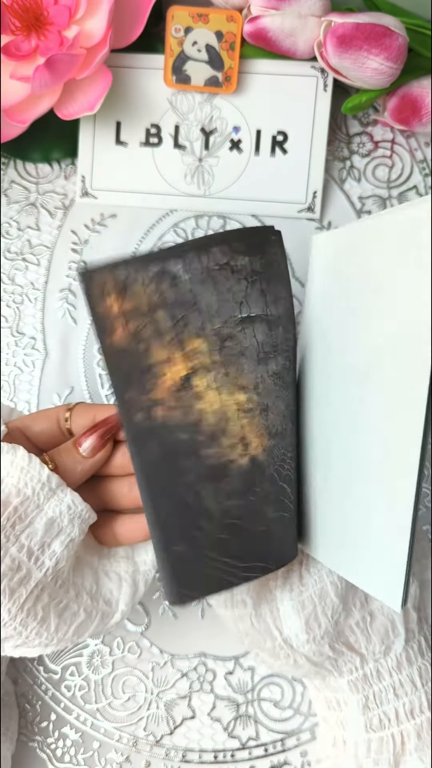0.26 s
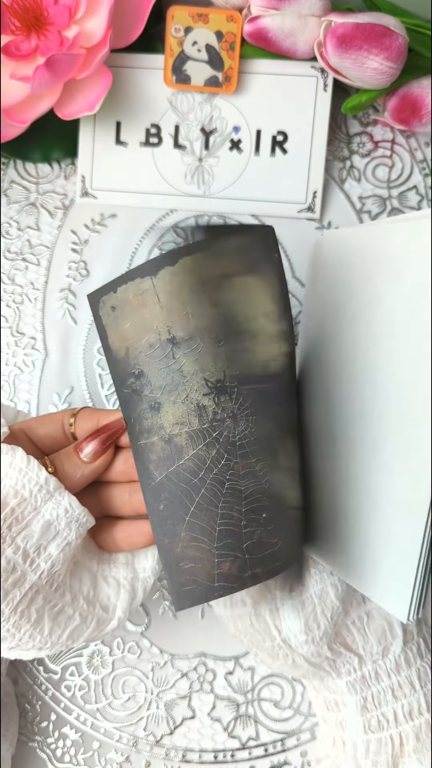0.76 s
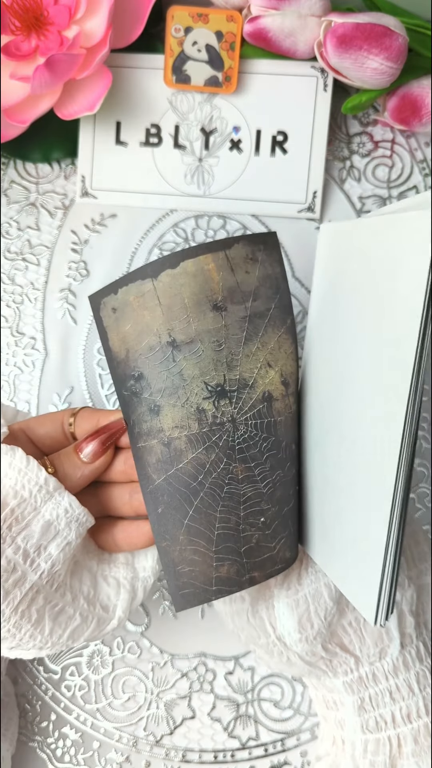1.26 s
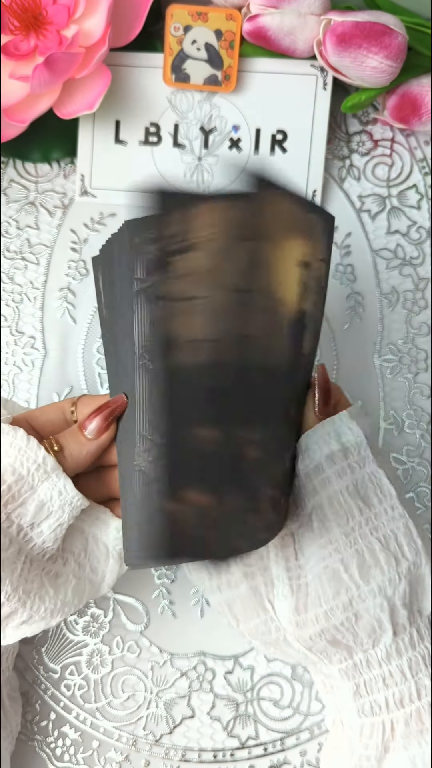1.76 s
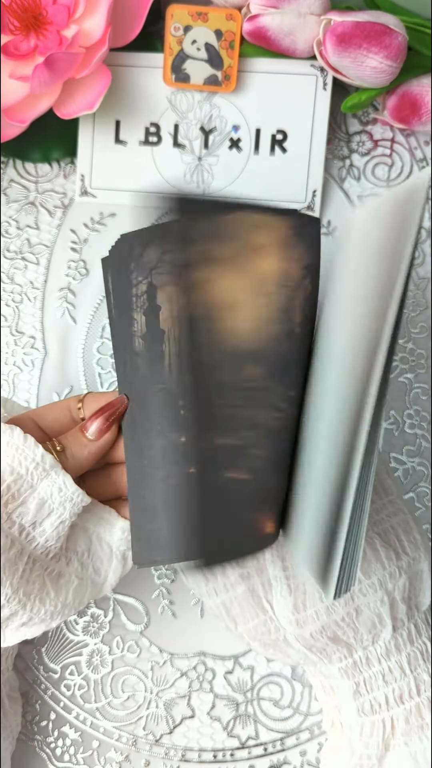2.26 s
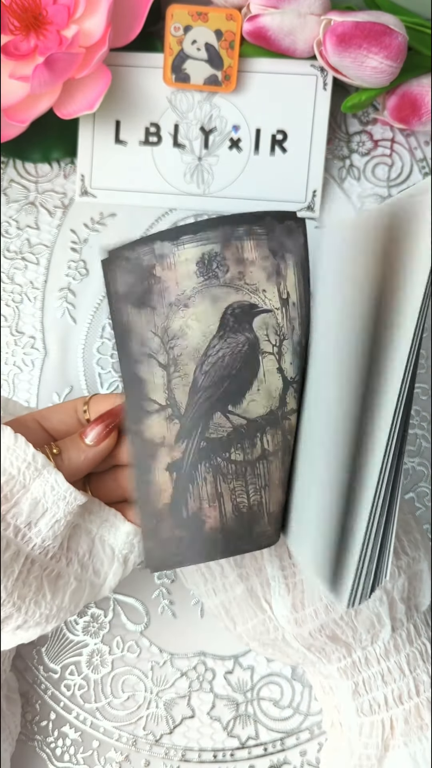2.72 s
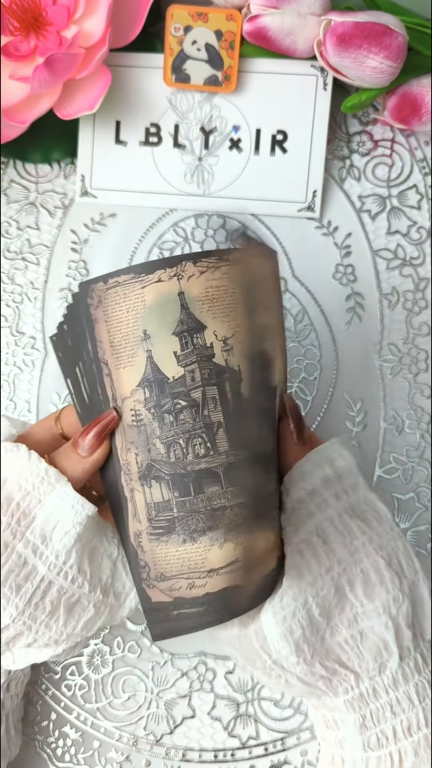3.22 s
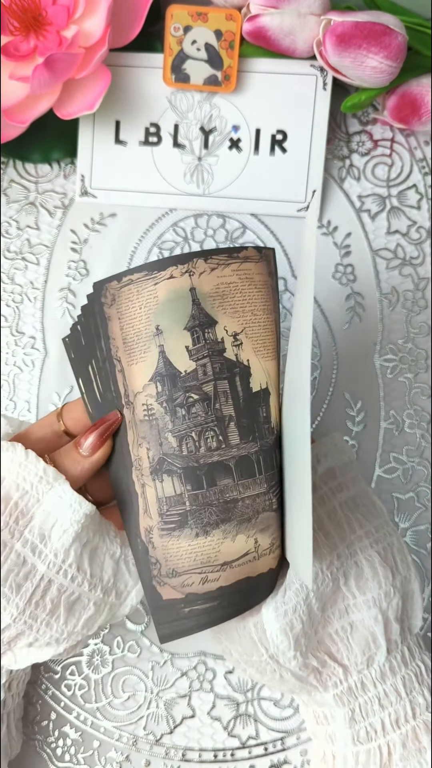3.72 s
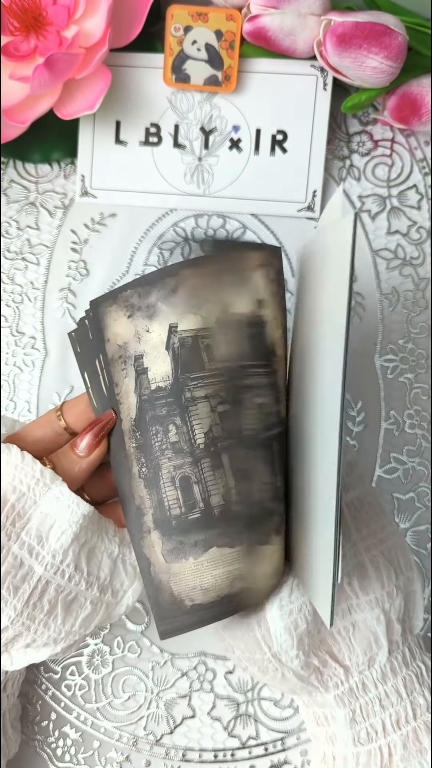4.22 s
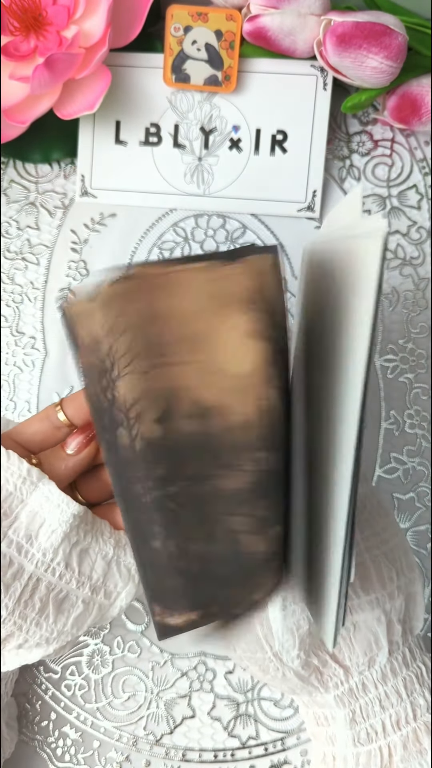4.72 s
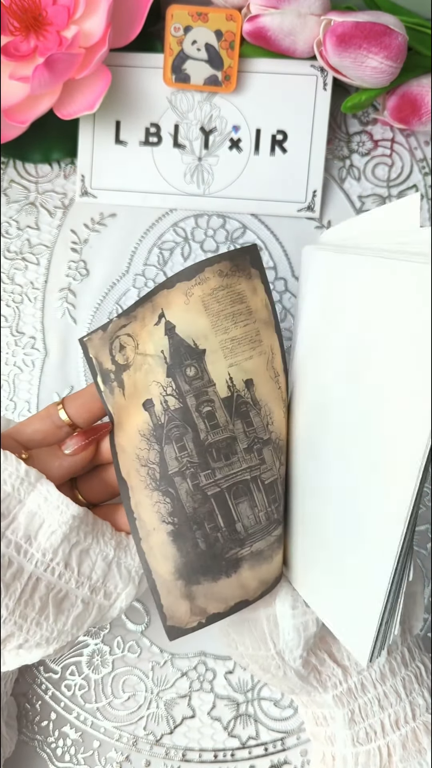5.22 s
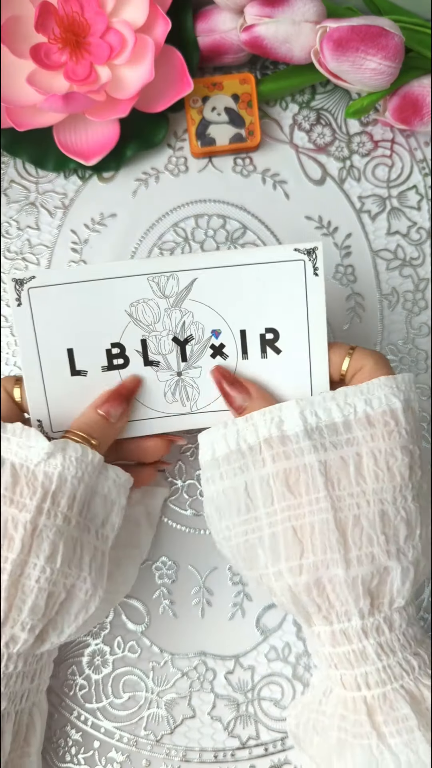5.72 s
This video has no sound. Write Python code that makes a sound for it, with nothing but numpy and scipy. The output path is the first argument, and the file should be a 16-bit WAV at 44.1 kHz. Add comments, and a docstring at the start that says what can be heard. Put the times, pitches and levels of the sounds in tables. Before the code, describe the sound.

Hands thumb through a stack of stiff paper sheets above a table. Each edge snaps free with a crisp tick and slides on with a short hiss, in uneven runs over soft rustling. A sheet slaps the stack midway, and a sharper, louder snap comes near the end. Then thumbs rub a card with quick ticks. The microphone is close, in a small room with faint hiss and rumble.

```python
"""Paper rustles and ticks over faint hiss and rumble: hands thumb through a stack of stiff printed
sheets above a table, close to a mono microphone. Each sheet edge snaps off the thumb and slides on
with a short hiss, and sheets slap and scrape on the stack, all with a touch of small room.
At the end the thumbs rub a card, which rings under the uneven friction."""
import sys
import numpy as np
from scipy import signal
from scipy.fft import rfft, irfft, next_fast_len
from scipy.io import wavfile
from scipy.ndimage import uniform_filter1d

SR = 44100
rng = np.random.default_rng(int(sys.argv[2]) if len(sys.argv) > 2 else 0)


def put_to_file(sound):
    """Save the sound as 16-bit audio at rate SR, in the file named by the first command-line argument."""
    columns = np.atleast_2d(sound).T  # one column per channel
    safe = np.clip(columns, -1, 1)
    whole_steps = np.round(safe * 32767)
    wavfile.write(sys.argv[1], SR, whole_steps.astype(np.int16))


N = 263751


def gain_of(db):
    """dB to gain."""
    return 10 ** (np.asarray(db) / 20)


def unit_rms(x):
    """Scales to rms 1."""
    return x / np.sqrt(np.mean(x ** 2) + 1e-20)


def unit_peak(x):
    """Scales so that the loudest 1.5 ms have rms 1."""
    return x / np.sqrt(uniform_filter1d(x ** 2, size=66).max())


def fader(rows, column):
    """Gain at every sample from one dB column of an automation table."""
    rows = np.array(rows)
    return gain_of(np.interp(np.arange(N) / SR, rows[:, 0], rows[:, column]))


def flutter(noise, samples, depth_db):
    """A gain that wavers by depth_db rms, following noise smoothed over some samples."""
    return gain_of(depth_db * unit_rms(uniform_filter1d(noise, samples)))


def equalised(x, points):
    """Shapes noise with an EQ curve, to rms 1."""
    hz, db = np.transpose(points)
    size = next_fast_len(len(x))
    f = np.fft.rfftfreq(size, 1 / SR)
    response = gain_of(np.interp(np.log(f + 1), np.log(hz + 1), db))
    return unit_rms(irfft(rfft(x, size) * response, size)[:len(x)])


def band(x, lo_hz, hi_hz):
    """Causal band-pass."""
    sos = signal.butter(2, [lo_hz, min(hi_hz, .45 * SR)], "bandpass", fs=SR, output="sos")
    return signal.sosfilt(sos, x)


def ringing(x, modes):
    """Plays x through parallel resonators."""
    return sum(gain_of(db) * signal.lfilter(*signal.iirpeak(hz, hz / width, SR), x)
               for hz, width, db in modes)


def add(mix, start_s, sound):
    """Mixes a sound in at its cue."""
    part = mix[round(start_s * SR):][:len(sound)]
    part += sound[:len(part)]


# EQ of the microphone hiss: f/Hz, level/dB
HISS_EQ = [(88, -11.5), (150, -5.5), (244, -26), (275, -5.5), (383, -16.5), (422, -9.5), (745, -17.5),
           (4670, -28.5), (16000, -31)]
# EQ of the deep rumble: f/Hz, level/dB
DEEP_EQ = [(15, -12), (30, -2.5), (48, 10), (62, -13), (80, -42), (120, -33)]
# Fader moves for the rumble of table and room: t/s, deep level/dB, drone level/dB
RUMBLE_LEVELS = [(0.0, -72, -73), (0.23, -70.5, -68.5), (1.68, -69.5, -70.5), (1.9, -60, -71),
                 (1.93, -65, -50), (2.01, -70, -69), (2.75, -71.5, -63.5), (3.3, -61, -82),
                 (3.36, -59, -48.5), (3.46, -66, -68), (3.95, -59.5, -73.5), (4.35, -64.5, -76.5),
                 (4.88, -71, -66.5), (4.91, -52.5, -63), (5.01, -78, -75), (5.2, -58.5, -64.5),
                 (5.45, -75, -74), (5.98, -65, -61.5)]


def hiss_and_rumble():
    """The bed: steady microphone hiss and a rumble that follows the arms on the table."""
    hiss = gain_of(-68) * equalised(rng.standard_normal(N), HISS_EQ)
    deep = fader(RUMBLE_LEVELS, 1) * equalised(rng.standard_normal(N), DEEP_EQ)
    drone = fader(RUMBLE_LEVELS, 2) * unit_rms(band(rng.standard_normal(N), 75.5, 187))
    return hiss + deep + drone


# EQ of the rubbing fibres: f/Hz, level/dB
RUSTLE_EQ = [(88, -66), (150, -4.5), (354, 15), (805, 12), (1690, 7.5), (3220, 0.5), (3840, -2.5),
             (4950, -5), (6140, -8), (7470, -10.5), (9440, -9.5), (11900, -16), (13700, -15), (15100, -17),
             (16000, -18)]
# Narrow sheen on sliding paper, here and in the flicks: f/Hz, width/Hz, level/dB
PAPER_SHEEN = [(7500, 680, -0.5), (10920, 980, -4)]
# Fader moves for paper sliding on paper: t/s, level/dB, treble relative to that level/dB
RUSTLE_LEVELS = [(0.0, -73.5, -1), (.3, -73, 0.5), (.6, -68.5, -0.5), (1.0, -75, 2), (1.08, -64.5, 2),
                 (1.2, -80, 1), (1.5, -75, 4), (1.9, -67, 0), (2.6, -66, -4.5), (2.8, -72.5, 2.5),
                 (3.05, -74.5, -6), (3.3, -70, 11), (3.375, -54.5, -3.5), (3.5, -68, 3), (3.6, -69.5, -5),
                 (3.75, -70.5, -4), (4.2, -72.5, 1), (4.38, -61, -0.5), (4.65, -77.5, 1),
                 (4.87, -64.5, 9.5), (5.0, -79, 0), (5.2, -65.5, 7), (5.36, -73.5, -2), (5.44, -62, 4),
                 (5.52, -69, 3), (5.65, -65.5, 12), (5.98, -58.5, -6)]


def rustle():
    """Fibres rub in clumps: hiss plus tiny ticks, with the treble on its own fader."""
    clumps = flutter(rng.standard_normal(N), samples=300, depth_db=2.0)
    tick_sizes = gain_of(3.8 * np.minimum(rng.exponential(1, N), 4))
    ticks = tick_sizes * (rng.random(N) < 300 / SR)  # about 300 a second
    rub = equalised(clumps * rng.standard_normal(N) * (1 + 2.5 * ticks), RUSTLE_EQ)
    dull = signal.sosfiltfilt(signal.butter(2, 3000, fs=SR, output="sos"), rub)
    treble = unit_rms(rub - dull + ringing(rub, PAPER_SHEEN))
    return fader(RUSTLE_LEVELS, 1) * (unit_rms(dull) + fader(RUSTLE_LEVELS, 2) * treble)


SNAP_HZ, EDGE_HZ, AIR_HZ, THUD_HZ = 3500, 6600, 10200, 306  # the thud is the stack giving way
AIR_DB, THUD_DB = -5, -20.5  # relative to the edge and to the body
BEND_SPREAD = .05  # the sheet's bend scatters the snap and edge pitches by this share
SNAP_CLIMB, EDGE_SAG, HARD_SNAP_DB = 0.003, 0.0066, -35  # climb and sag: share of pitch per dB
PEEL_S, PEEL_T60_S = 0.00025, 0.0077  # attack time of a flick with this base decay
CLICK_LOST_S = .0008  # the longer the attack against this, the weaker the release click
SLIDE_S, SLIDE_T60_S, STOP_T60_S = 0.012, 0.23, 0.026  # the slide fades slowly, then stops and dies
# The next three hold one factor per band of a flick: body, snap, edge, air, thud.
# Band edges, as a ratio below and above the pitch
BAND_SPANS = [1.52, 1.252, 1.11, 1.18, 1.33]
# Decay, as a factor on the base t60
BAND_DECAYS = [2.5, 2.38, 1.6, 0.85, 1.2]
# Size of the release click against the crackle
BAND_CLICKS = [14.0, 7.0, 4.0, 1.5, 14.0]
# EQ of the slide hiss: f/Hz, level/dB
SLIDE_EQ = [(250, -15), (700, 10), (1600, -2), (3200, 6), (5000, -14.5), (7500, -7.5), (11500, -10),
            (15500, -18)]
# Cues for sheet edges snapping free:
# t/s, body f/Hz, body level/dB, snap level/dB, edge level/dB, base t60/s, slide level/dB
FLICK_CUES = [(0.0267, 1220.0, -47.5, -60, -66.9, 0.0038, -64), (0.057, 1260, -51, -59.5, -59, 0.0086, -70),
              (0.1043, 1310, -49, -62, -69, 0.0087, -77), (0.1407, 1280.0, -52, -57, -65.9, 0.0085, -74),
              (0.2117, 1150, -47, -61, -61, 0.0059, -71), (0.3309, 1110, -49, -55, -57.3, 0.0086, -55.5),
              (0.3731, 1170.0, -50, -49, -57, 0.0049, -65), (0.4035, 1000, -38, -43.5, -52, 0.0033, -63),
              (0.435, 1250.0, -38.8, -40.5, -54, 0.0055, -54.5),
              (0.6007, 890, -35.5, -51, -51, 0.0085, -72), (0.6567, 1020, -33, -36.5, -43, 0.0069, -55),
              (0.711, 1430, -57, -49.5, -54.7, 0.022, -63), (0.724, 1440.0, -68, -48, -72, 0.0064, -75),
              (0.7822, 1030, -29, -35.5, -39.5, 0.0083, -47), (1.0301, 1050, -23, -29, -28.5, 0.0095, -44),
              (1.0845, 1160, -63, -56, -67, 0.022, -71), (1.819, 1170.0, -66, -45, -57, 0.0049, -75),
              (1.8457, 1390, -72, -55, -64, 0.014, -72), (1.869, 1050.0, -64, -49, -52, 0.0068, -75),
              (1.9047, 1410.0, -55, -57.5, -69, 0.0097, -75), (1.948, 950, -37.5, -58.8, -66, 0.013, -57),
              (1.979, 1310, -48, -51, -64, 0.0067, -58), (2.0607, 1290.0, -46, -43.5, -50, 0.0049, -76),
              (2.1177, 1140.0, -51, -72, -71, 0.0034, -61), (2.1386, 1240.0, -49, -53, -53.4, 0.0096, -79),
              (2.2215, 1250.0, -49.5, -69, -68, 0.0054, -79), (2.243, 1360.0, -52, -56.8, -63, 0.012, -79),
              (2.2948, 1290.0, -49, -51, -69.4, 0.0048, -76), (2.361, 1180.0, -43.5, -47, -54, 0.0048, -75),
              (2.3909, 1150, -42.5, -48.5, -52.5, 0.0071, -76), (2.496, 1060.0, -61, -56.5, -61, 0.02, -74),
              (2.5302, 1140, -50, -58, -60, 0.012, -57), (2.5589, 1190, -34, -43, -48, 0.0024, -51.5),
              (2.6045, 1360, -41, -44, -48.5, 0.0067, -58.5),
              (2.645, 1240.0, -63, -53, -52.9, 0.019, -51.5),
              (2.661, 1050, -37.5, -67.3, -51.7, 0.0044, -60),
              (2.7138, 1190.0, -46.6, -47.5, -51.5, 0.0076, -59.5),
              (2.726, 1020, -39.4, -49.4, -48, 0.0035, -56), (2.8369, 980, -31, -28, -37.5, 0.0032, -50),
              (2.87, 1190.0, -56, -54.8, -65, 0.013, -60), (2.894, 1180.0, -55, -46, -59, 0.0064, -74),
              (2.933, 1080, -32, -39.5, -46, 0.005, -51.5), (3.1765, 1230.0, -54, -58, -60, 0.0106, -76),
              (3.196, 1050.0, -59, -57, -62, 0.0129, -61),
              (3.258, 1180, -51.5, -42.4, -47.5, 0.0086, -53.5),
              (3.3035, 1320.0, -58, -47.7, -48.9, 0.019, -69), (3.3618, 1430, -27, -25.5, -54, 0.0099, -59),
              (3.5249, 1070, -46, -63, -51, 0.0077, -64), (3.5792, 1030, -60, -53.5, -53, 0.03, -57.5),
              (3.606, 910, -56, -68, -64, 0.0079, -60), (3.6275, 1080, -48, -55, -54.5, 0.01, -75),
              (3.6831, 1020, -39.5, -61, -54.8, 0.009, -51.5), (3.7572, 1070, -42.5, -56, -50, 0.009, -56),
              (3.7829, 1080, -44.5, -52.9, -53.4, 0.012, -53.5),
              (3.8056, 1100, -40.7, -51, -55.3, 0.0029, -57.5),
              (3.834, 1030, -41.5, -55.2, -52, 0.0072, -56.5),
              (3.857, 1040, -44, -57.6, -53.2, 0.0067, -58),
              (3.8806, 1130, -44, -57.8, -58.6, 0.0082, -54.5),
              (3.9043, 1110.0, -42, -47, -59, 0.0084, -55), (3.923, 1190, -44, -59, -60, 0.009, -51.5),
              (3.931, 1350.0, -74, -40, -58, 0.0048, -79), (3.9539, 1330, -39.5, -36.5, -40, 0.0072, -52),
              (3.967, 1140.0, -70, -72, -44, 0.0053, -81), (4.0565, 1080, -35, -41.5, -47, 0.0027, -52.5),
              (4.077, 1070, -42, -53.5, -57, 0.0047, -54.5), (4.1104, 1040, -42.5, -51, -52, 0.0035, -57),
              (4.135, 1100, -43, -54, -51, 0.0081, -76), (4.1576, 1100, -42, -55.1, -60, 0.0053, -51.5),
              (4.1807, 1430.0, -50, -42, -59, 0.007, -65), (4.2096, 1060, -44.5, -55, -62, 0.0056, -73),
              (4.2522, 1120.0, -42, -49.4, -58, 0.0049, -57.5),
              (4.262, 1310, -40.5, -43.5, -65, 0.0071, -59), (4.277, 1120.0, -45, -55.6, -59, 0.005, -72),
              (4.2926, 1070.0, -45, -51, -61, 0.0054, -57), (4.3397, 1040, -44.5, -52, -59, 0.0019, -59),
              (4.378, 1380.0, -51, -54, -66.8, 0.012, -80), (4.397, 1400, -44.4, -43, -46, 0.01, -70),
              (4.4086, 1200, -42, -49, -56, 0.003, -82), (4.479, 1150, -58, -72, -58, 0.024, -73),
              (4.529, 1170, -43, -48, -51, 0.0068, -61), (4.549, 1100, -59, -65, -56, 0.017, -77),
              (4.5648, 1200.0, -54, -68.8, -72, 0.0079, -64), (4.597, 1080, -55.5, -62, -56.5, 0.02, -66),
              (4.629, 1190, -52, -70, -70.9, 0.0065, -72), (4.645, 1140, -51, -70, -69, 0.0067, -76),
              (4.658, 1040, -51, -72, -72, 0.009, -77), (4.6695, 1090, -51.5, -61, -57, 0.0083, -56.5),
              (4.717, 1370.0, -52, -55.0, -54, 0.015, -63), (4.7693, 1240, -46.5, -50, -52, 0.0069, -75),
              (4.7991, 970.0, -46, -48, -50, 0.0084, -66), (4.81, 930.0, -44, -48, -48, 0.0022, -45),
              (4.8207, 1510, -30, -36, -36, 0.009, -48), (4.888, 1190, -41.5, -50.5, -55, 0.0067, -53),
              (4.9193, 1350, -43.5, -52, -57, 0.0059, -76), (4.989, 1520, -47, -51.5, -55, 0.0063, -59.5),
              (5.019, 1320, -49, -52.5, -58, 0.0083, -68), (5.0661, 1500, -49.5, -56, -56, 0.0052, -76),
              (5.0967, 1610.0, -47, -50, -51, 0.008, -79), (5.126, 1510.0, -58, -60.8, -57, 0.019, -61),
              (5.1517, 1120, -17.5, -7, -15.2, 0.0054, -36), (5.181, 1330, -41, -54.8, -53.0, 0.01, -69),
              (5.2013, 1500.0, -61, -54.9, -44, 0.015, -74), (5.3659, 1060.0, -62, -52, -34.5, 0.0024, -63),
              (5.3793, 1280.0, -33, -30.5, -37.5, 0.0034, -44.5),
              (5.405, 960, -47.5, -63.6, -58, 0.023, -47), (5.4194, 1240, -27.5, -31, -37, 0.0059, -64),
              (5.465, 1030, -43.5, -49, -49, 0.013, -47.5), (5.563, 1420.0, -37.5, -35.5, -42, 0.0038, -70),
              (5.5777, 1420.0, -44.2, -61, -57.5, 0.0095, -52), (5.592, 1420, -40.5, -59, -40, 0.025, -57),
              (5.6346, 1010, -28, -31, -34, 0.0075, -71), (5.659, 1080, -36.5, -59, -48.9, 0.0095, -54),
              (5.7132, 1060, -30.5, -41, -42.8, 0.01, -39.5), (5.7416, 1420, -30, -44.5, -45, 0.0052, -66),
              (5.77, 1480, -30.5, -47, -44, 0.0058, -55), (5.792, 1490.0, -33.5, -50, -42.1, 0.005, -62),
              (5.814, 1450.0, -34, -55.4, -38.5, 0.0047, -45), (5.8255, 1530.0, -26, -34, -42, 0.002, -62),
              (5.846, 1440.0, -35, -48.5, -41, 0.004, -66), (5.8549, 1410, -29, -34.5, -41, 0.0063, -47.5),
              (5.8764, 1240.0, -34, -48, -46.3, 0.0034, -66),
              (5.8997, 1400, -26.5, -40, -36.5, 0.0053, -42), (5.9314, 1350, -25, -38, -35.1, 0.0059, -44),
              (5.9508, 1430, -31, -42, -39, 0.0076, -67), (5.9638, 1260.0, -40, -46, -41, 0.008, -72),
              (5.9754, 1390.0, -29.5, -40.0, -37, 0.0027, -43)]


def flicks():
    """An edge leaves the thumb: a click with a few ms of crackle, then the hiss of the sheet sliding off."""
    t, snaps, slide = np.arange(2048) / SR, np.zeros(N), np.zeros(N)
    draws = rng.standard_normal((len(FLICK_CUES), len(t) + 2))
    slide_envelope = gain_of(-60 * t / SLIDE_T60_S - 60 * np.maximum(t - SLIDE_S, 0) / STOP_T60_S)
    for cue, (snap_bend, edge_bend, *crackle) in zip(FLICK_CUES, draws):
        start, body_hz, body_db, snap_db, edge_db, t60, slide_db = cue
        attack = PEEL_S * (t60 / PEEL_T60_S) ** 2
        onset = np.minimum((t + 1 / SR) / attack, 1)
        release = np.exp(-attack / CLICK_LOST_S) * (t == 0)
        # The snap pitches up as it outweighs the body; the edge pitches down on hard snaps.
        snap_hz = SNAP_HZ * (1 + BEND_SPREAD * snap_bend + SNAP_CLIMB * (snap_db - body_db))
        edge_hz = EDGE_HZ * (1 + BEND_SPREAD * edge_bend - EDGE_SAG * (snap_db - HARD_SNAP_DB))
        pitches = body_hz, snap_hz, edge_hz, AIR_HZ, THUD_HZ
        levels = body_db, snap_db, edge_db, edge_db + AIR_DB, body_db + THUD_DB
        for hz, db, span, decay, click in zip(pitches, levels, BAND_SPANS, BAND_DECAYS, BAND_CLICKS):
            envelope = onset * gain_of(-60 * np.maximum(t - attack, 0) / (decay * t60))
            burst = band(click * release + crackle * envelope, hz / span, hz * span)
            add(snaps, max(start - attack, 0), gain_of(db) * unit_peak(burst))
        add(slide, start, gain_of(slide_db) * slide_envelope)
    hiss = equalised(rng.standard_normal(N), SLIDE_EQ)
    return snaps + slide * (hiss + ringing(hiss, PAPER_SHEEN))


def sheet_comb(x, spacing_hz=4340, back_gain=0.043):
    """The back of the sheet pulls while the front pushes; arriving later, it cuts shallow, regular dips."""
    size = next_fast_len(N + 64)
    delay = np.exp(-2j * np.pi * np.fft.rfftfreq(size, 1 / SR) / spacing_hz)
    return irfft(rfft(x, size) * (1 - back_gain * delay), size)[:N]


def room_reverb(x, t60_s=0.17, predelay_s=.006):
    """The walls return a short, band-limited tail."""
    t = np.arange(SR // 3) / SR
    tail = band(rng.standard_normal(len(t)), 440, 10000) * gain_of(-60 * t / t60_s) * (t > predelay_s)
    return signal.fftconvolve(x, tail / np.linalg.norm(tail))[:N]


# Airy top on every scrape: f/Hz, width/Hz, level/dB
SCRAPE_SHEEN = [(7500, 1200, -24), (11000, 2100, -43), (14000, 3000, -26)]
# Cues for sheets slapping or scraping the stack: t/s, attack/s, t60/s, level/dB, centre f/Hz
SCRAPE_CUES = [(0.224, 0.016, 0.047, -55, 1670), (0.463, 0.017, 0.12, -57.5, 4650),
               (0.517, 0.0029, 0.044, -52.5, 5000), (0.592, 0.0053, 0.029, -43, 990),
               (0.745, 0.012, 0.093, -56.5, 3380), (0.878, 0.0038, 0.099, -55.5, 3640),
               (1.108, 0.013, 0.044, -45.5, 3870), (1.792, 0.034, 0.17, -58, 4220),
               (1.912, 0.0096, 0.12, -40.5, 870), (1.935, 0.0063, 0.06, -44.5, 1050),
               (2.422, 0.013, 0.026, -51.5, 2880), (2.637, 0.023, 0.056, -49, 3900),
               (2.726, 0.0083, 0.018, -51, 3000), (3.153, 0.0044, 0.16, -59.5, 6800),
               (3.19, 0.0097, 0.029, -46.5, 6450), (3.344, 0.0055, 0.25, -34, 1240),
               (3.354, 0.0039, 0.057, -23.5, 2730), (3.366, 0.0091, 0.19, -41, 2670),
               (3.468, 0.013, 0.24, -54, 9000), (3.533, 0.0038, 0.04, -49, 6960),
               (3.684, 0.017, 0.28, -53.5, 5000), (3.713, 0.018, 0.022, -47.5, 7000),
               (4.016, 0.0055, 0.09, -50, 880), (4.166, 0.011, 0.029, -49, 7300),
               (4.43, 0.033, 0.22, -64, 7500), (4.59, 0.013, .03, -54, 7000),
               (4.802, 0.029, 0.032, -43.5, 3000), (4.871, 0.022, 0.096, -58, 5000),
               (5.147, .0006, .012, -31.5, 1200), (5.19, 0.011, 0.024, -46, 5030),
               (5.349, 0.0061, 0.22, -57.5, 6140), (5.412, 0.0028, 0.018, -31, 2900),
               (5.574, 0.012, 0.053, -46, 6030), (5.632, 0.0064, 0.018, -36.5, 830),
               (5.709, 0.0022, 0.067, -43, 2060), (5.785, 0.0049, 0.016, -43, 2980),
               (5.907, 0.0024, 0.0052, -45, 2950)]


def scrapes():
    """Grainy noise that swells as the sheet comes down and dies as it settles."""
    t, out = np.arange(8192) / SR, np.zeros(N)
    draws = rng.standard_normal((len(SCRAPE_CUES), 2, len(t)))
    for (start, attack, t60, db, hz), (noise, lumps) in zip(SCRAPE_CUES, draws):
        friction = noise * flutter(lumps, samples=60, depth_db=2.7)
        width = hz * (hz / 1000) ** 0.22  # brighter scrapes are wider for their pitch
        edges = max(hz - width / 2, hz / 4), hz + width / 2
        body = unit_rms(band(band(friction, *edges), *edges))
        envelope = np.minimum(t / attack, 1) ** 2 * gain_of(db - 60 * np.maximum(t - attack, 0) / t60)
        add(out, start, envelope * (body + ringing(friction, SCRAPE_SHEEN)))
    return out


# Resonances of the stiff card: f/Hz, width/Hz, level/dB
CARD_MODES = [(550, 260, -5), (1690, 190, 12), (6900, 820, -0.5), (10700, 1000, -7)]
# Fader moves for the thumbs rubbing it: t/s, level/dB
RUB_LEVELS = [(5.54, -76), (5.58, -55), (5.82, -52.5), (5.88, -52), (5.91, -81), (5.94, -51), (5.98, -53)]


def card_rub():
    """Uneven friction under the thumbs rings the card."""
    grip = flutter(rng.standard_normal(N), samples=200, depth_db=2.5)
    ring = unit_rms(ringing(grip * rng.standard_normal(N), CARD_MODES))
    touching = np.arange(N) / SR > RUB_LEVELS[0][0]
    return touching * fader(RUB_LEVELS, 1) * ring


def scene():
    """One microphone feeds both channels; only flicks and scrapes go to the reverb."""
    paper = sheet_comb(flicks() + scrapes())
    mono = paper + gain_of(-22.5) * room_reverb(paper) + rustle() + card_rub() + hiss_and_rumble()
    return np.array([mono, mono])


def record(dry):
    """The input stage rounds off the loudest snap; a steep low-pass trims the top."""
    ceiling, cutoff_hz = .9, 15900
    rounded = ceiling * np.tanh(dry / ceiling)
    lowpass = signal.firwin(511, cutoff_hz, window=("kaiser", 9), fs=SR)
    return signal.oaconvolve(rounded, lowpass[None], "same")


dry = scene()
out = record(dry)
put_to_file(out)
```